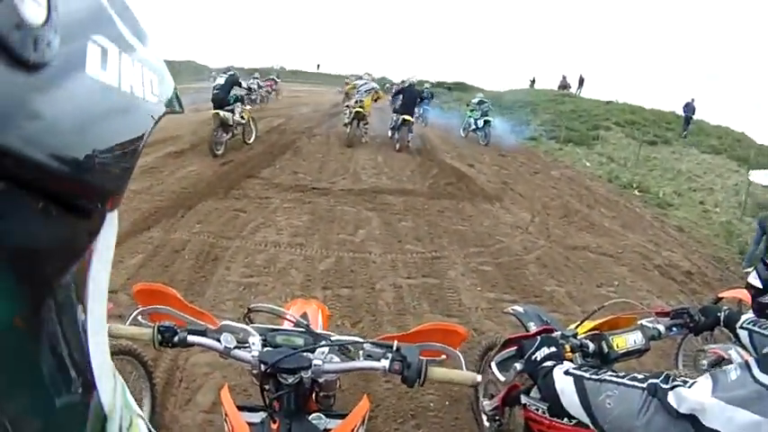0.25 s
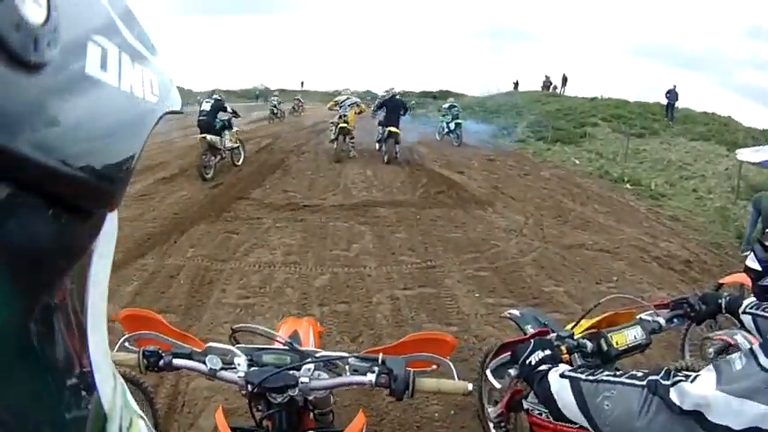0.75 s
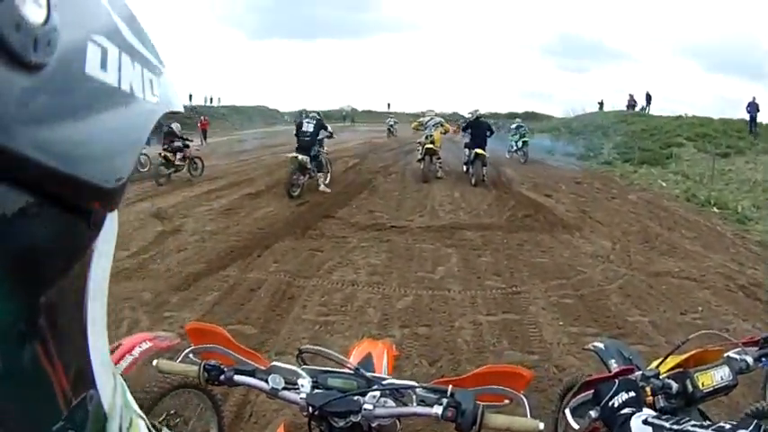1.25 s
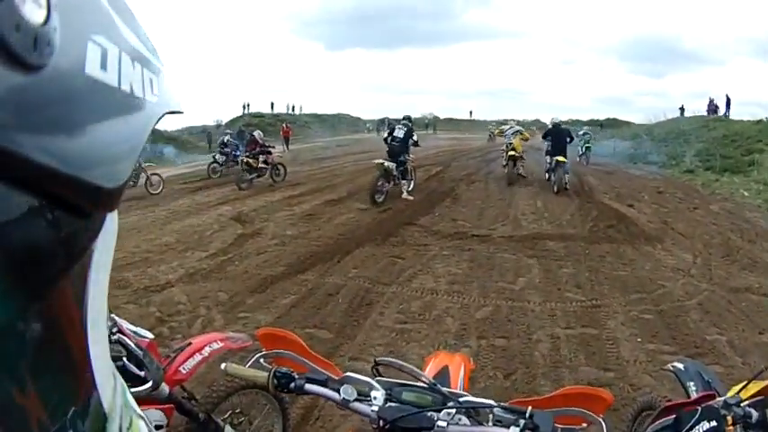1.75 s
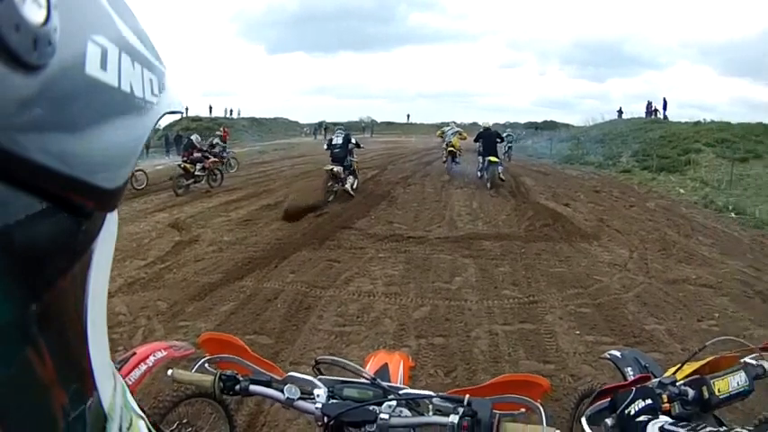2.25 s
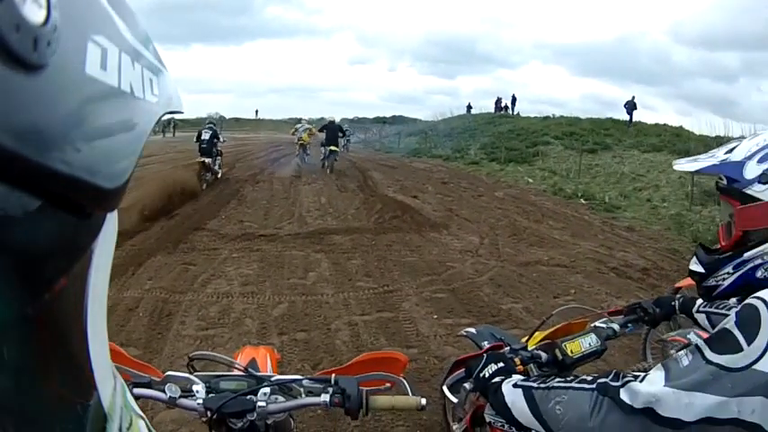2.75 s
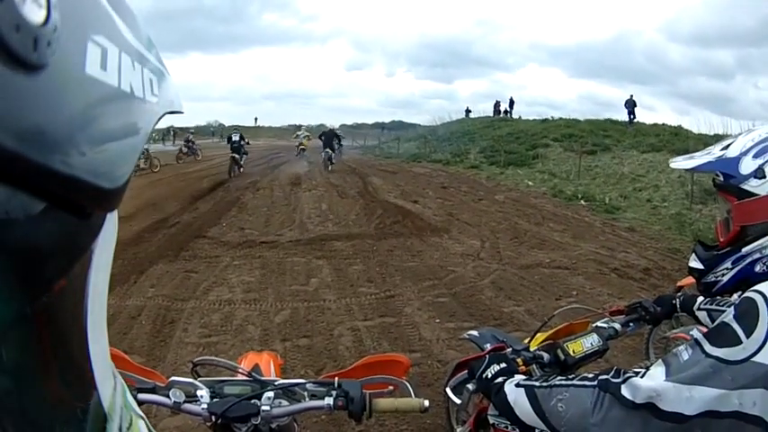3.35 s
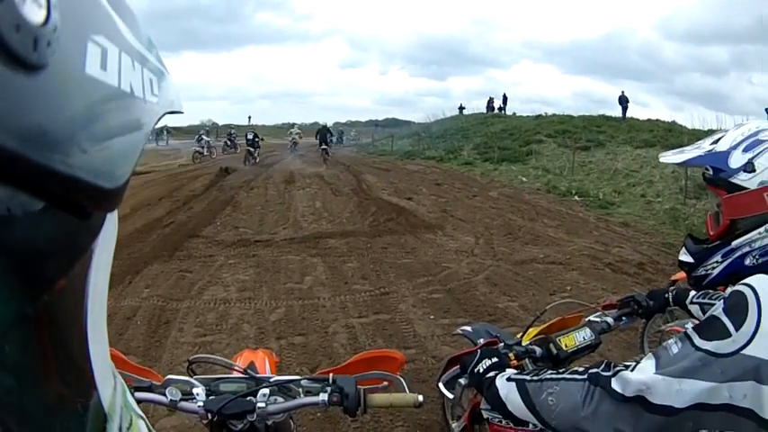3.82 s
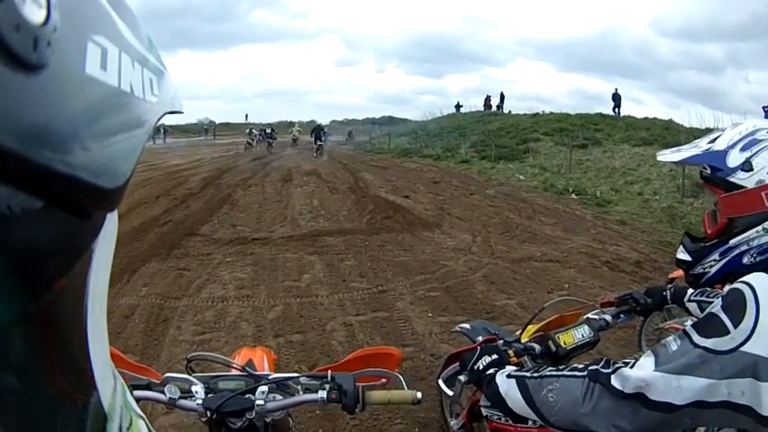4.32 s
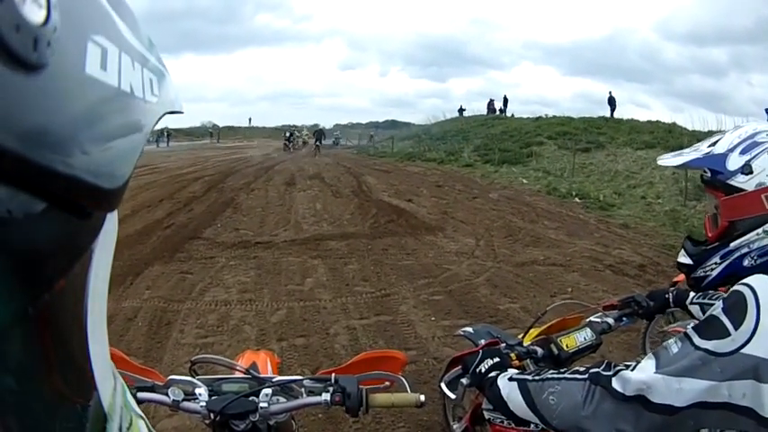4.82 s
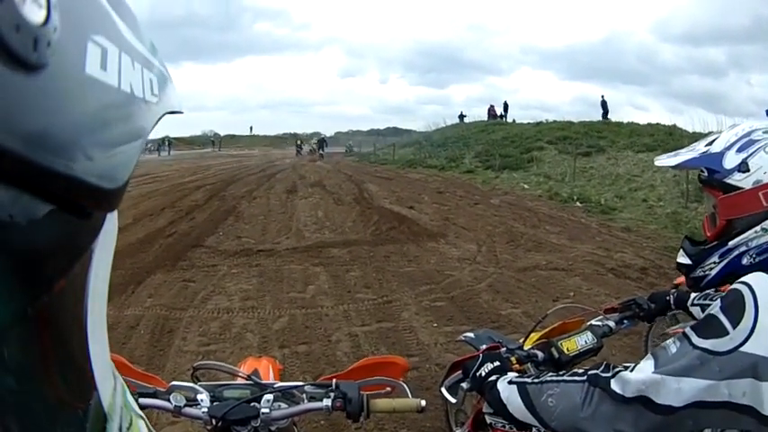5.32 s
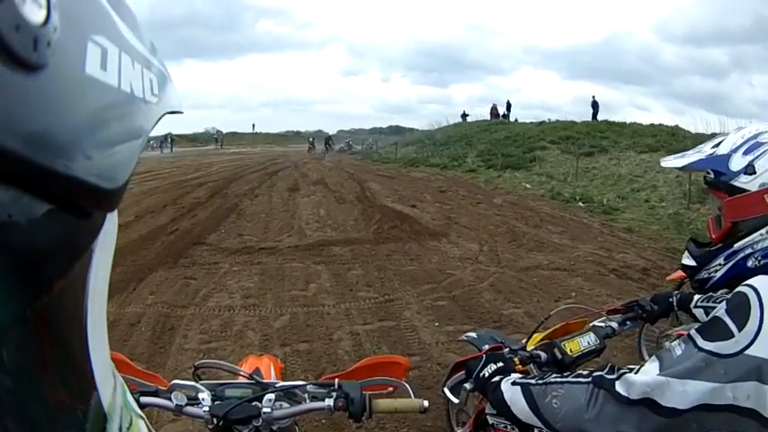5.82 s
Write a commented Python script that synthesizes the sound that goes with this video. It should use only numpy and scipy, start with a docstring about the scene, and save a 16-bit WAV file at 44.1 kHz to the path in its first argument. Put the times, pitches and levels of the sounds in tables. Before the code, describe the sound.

Motocross bikes on open dirt, heard from a rider's helmet through a closed microphone case that dulls the treble. From 0 s a row of engines idles out of step, with low thuds, chugging silencers, faint even hiss and tiny dry ticks. A bike up the track drones nasally, its pitch rising and falling, fading by about 5.6 s. A nearer one blips low at 0.4, 0.6, 1.3 and 1.8 s. A hard bang hits at 0.5 s, with barking pops around 1.1, 1.4 and 1.7 s. From 1.8 to 3.8 s a four-stroke alongside growls, roars and rasps with slight clang, its revs wavering, then cuts off. A strong blip at 3.8 s and thin metallic buzzes follow at 3.9 and 4.3 s. Thumping pops cluster from 4 s, throaty swells pass between 4.3 and 5 s, then loud blips and bangs come at 5.6 to 6 s.

```python
"""Dirt bikes at a motocross start, heard from a rider's helmet with the microphone in a closed case.
From the outset a row of bikes idles unevenly, exhausts bang and pop, one bike blips and another pulls away
up the track; other bikes swell throatily from 1.6 s. A four-stroke alongside is held on the throttle from
1.8 to 3.8 s, and thin parts buzz briefly afterwards. Each engine is a train of firings that ring its
silencer; noise gives the gas and an even hiss, and the case muffles the treble."""
import sys
import numpy as np
from scipy import signal
from scipy.fft import rfft, irfft, next_fast_len
from scipy.io import wavfile
from scipy.ndimage import uniform_filter1d

SR = 44100
rng = np.random.default_rng(int(sys.argv[2]) if len(sys.argv) > 2 else 0)


def wav_record(signal):
    """Record a signal, one row per channel, as 16-bit PCM in the file named by sys.argv[1]."""
    frames = np.transpose(np.atleast_2d(signal))
    bounded = np.clip(frames, -1, 1)
    # unit amplitude maps onto the largest positive 16-bit level
    quanta = np.round(bounded * 32767).astype(np.int16)
    wavfile.write(sys.argv[1], SR, quanta)


N = 267687

# raspy silencer colour: (frequency [Hz], level [dB])
RASP_COLOUR = [(600, -39), (1300, 10), (1700, 12.5), (2050, 8.5), (2400, -10.5), (4400, -34.5),
               (9000, -61.5)]
# sharp crack of an exhaust: (frequency [Hz], level [dB])
CRACK_COLOUR = [(400, -13), (1000, 4.5), (1800, 3.5), (3200, -4.5), (4400, -16), (5500, -16), (8000, -29.5),
                (11000, -46.5)]


def undb(db):
    """Decibels to amplitude gain."""
    return 10 ** (np.asarray(db) / 20)


def unit(x):
    """Scale to rms 1 over the whole scene."""
    return x / np.sqrt(np.mean(x ** 2) + 1e-18)


def curves(table):
    """The columns of a table, joined by straight lines in time."""
    s, *columns = np.transpose(table)
    return [np.interp(np.arange(N) / SR, s, c) for c in columns]


def bump(s, half_s):
    """A flat-topped swell around a moment."""
    return np.exp(-((np.arange(N) / SR - s) / half_s) ** 4 / 2)


def clicks(times, sizes):
    """Negative pressure clicks, each shared between two samples to fall between them."""
    at = np.clip(times * SR, 0, N - 2)
    i = at.astype(int)
    late = at - i
    return -np.bincount(i, sizes * (1 - late), N) - np.bincount(i + 1, sizes * late, N)


def firings(hz, jitter, scatter_db, running=True):
    """One pulse a cycle, each early or late by jitter [cycles]; a running engine is caught mid-cycle."""
    cycles = np.cumsum(hz) / SR + running * rng.random()
    k = np.arange(1, int(cycles[-1]) + 1)
    chance = rng.standard_normal((1024, 2))[:len(k)]
    times = np.interp(k + jitter * chance[:, 0], cycles, np.arange(N) / SR)
    strength_db = scatter_db * np.clip(chance[:, 1], -2, 2)
    return clicks(times, undb(strength_db))


def gas(pulses, decay_s, swell_s=0.0004):
    """A puff of turbulent gas that swells as the valve opens and then dies, with the pulse's energy."""
    keep = np.exp(-2 / (decay_s * SR))
    power = signal.lfilter([1 - keep], [1, -keep], pulses ** 2 + 1e-18)
    swelling = uniform_filter1d(power, int(swell_s * SR) + 1)
    return np.sqrt(np.abs(swelling)) * rng.standard_normal(N)


def ring(x, points, rounding=0.58, size=4096):
    """Pass x through a body with this spectrum, scaled to peak 1 for a unit click; rounding softens the front."""
    hz, db = np.transpose(points)
    f = np.maximum(np.fft.rfftfreq(size, 1 / SR), 1)
    above_last_db = 20 * np.log10(np.maximum(f / hz[-1], 1))
    shape_db = np.interp(np.log(f), np.log(hz), db) - above_last_db
    # rounding 0 puts all the ringing after the front, 1 spreads it evenly on both sides
    cepstrum = irfft(np.log(undb(shape_db)))
    cepstrum[1:size // 2] *= 2 - rounding
    cepstrum[size // 2 + 1:] *= rounding
    # an open pipe radiates a pulse as a swing down and up
    response = irfft(np.exp(rfft(cepstrum) + 1j * np.pi / 4))
    response = np.roll(response, size // 2)
    response = response / np.abs(response).max()
    return signal.fftconvolve(x, response)[size // 2:size // 2 + N]


def resonate(x, hz, q):
    """One resonance with steep skirts, at rms 1; its centre may move."""
    turn = np.exp(2j * np.pi * np.cumsum(hz * np.ones(N)) / SR)
    keep = np.exp(-np.pi * np.mean(hz) / (q * SR))
    # shift the centre to 0 Hz, smooth with two equal poles, shift back
    smooth = signal.lfilter([1], np.poly([keep, keep]), x / turn)
    return unit(np.real(turn * smooth))


def scatter(x):
    """Reflections from the ground, bikes and riders smear the pulses of engines further off."""
    size = next_fast_len(N + SR)
    delays_s = [.0013, .0029, .0047]
    z = np.exp(-2j * np.pi * np.fft.rfftfreq(size, 1 / SR)[:, None] * delays_s)
    allpass = np.prod((z - .5) / (1 - .5 * z), axis=1)
    return irfft(rfft(x, size) * allpass, size)[:N]


def glance(x, lag_s=0.002717, sway=.12):
    """A reflection off the bike and rider alongside; its path sways once a second and shifts the colour."""
    t = np.arange(N) / SR
    lag = lag_s * (1 + sway * np.sin(2 * np.pi * (t + rng.random())))
    return unit(x + .7 * np.interp(t - lag, t, x))


def row(throb_db=-1, sputter_db=-34, hiss_db=-29):
    """Idling engines out of step: low thuds, chugging silencers, a sputter on top and a hiss of gas."""
    # loudness of the row: (time [s], thud level [dB], chug level [dB])
    row_levels = [(0, -36.5, -39.5), (.4, -39.5, -40.5), (1.2, -37, -37), (1.7, -35.5, -38),
                  (2.3, -42, -38), (3.2, -40, -39), (3.9, -40.5, -37.5), (4.3, -34, -37.5),
                  (5.1, -32.5, -36), (5.5, -33, -36.5), (6.07, -34.5, -35)]
    # firing rates along the row: [Hz]
    idle_hz = [13.3, 17.8, 21.5, 25.0, 39]
    # colour of the low thuds: (frequency [Hz], level [dB])
    thud_colour = [(20, -43.5), (40, -16.5), (75, -7.5), (125, 0.5), (190, -3), (300, -12), (700, -42),
                   (3000, -80)]
    # colour of the chugging silencers: (frequency [Hz], level [dB])
    chug_colour = [(50, -24), (150, -0.5), (250, 6.5), (420, 3), (680, -4), (1000, -11.5), (1400, -25.5),
                   (2000, -37.5), (4500, -50), (10000, -67.5)]
    thud_db, chug_db = curves(row_levels)
    pulses = sum(firings(np.full(N, hz), jitter=.1, scatter_db=1.5) for hz in idle_hz)
    nearest = firings(np.full(N, 18.), jitter=.13, scatter_db=2)  # one more engine, at 18 Hz

    thud_drive = pulses + .5 * gas(pulses, decay_s=0.055)
    thud = unit(ring(thud_drive, thud_colour, rounding=0.59)) * undb(thud_db)
    chug_drive = pulses + .8 * gas(pulses, decay_s=.0035)
    chug = unit(ring(chug_drive, chug_colour, rounding=.66)) * undb(chug_db)
    # throb, sputter and hiss follow the chug at a fixed distance in level
    throb_gas = gas(nearest, decay_s=0.0061, swell_s=.012)
    throb = unit(ring(throb_gas, chug_colour)) * undb(chug_db + throb_db)
    sputter_gas = gas(nearest, decay_s=0.0016)
    sputter = unit(ring(sputter_gas, CRACK_COLOUR)) * undb(chug_db + sputter_db)
    hiss_gas = scatter(gas(pulses, decay_s=0.0056))
    hiss = unit(ring(hiss_gas, RASP_COLOUR)) * undb(chug_db + hiss_db)
    return scatter(thud) + chug + throb + sputter + hiss


def leaver():
    """A bike pulling away up the track: a nasal drone whose firing rate rises and falls."""
    # its revs and loudness: (time [s], firing rate [Hz], level [dB])
    leaver_revs = [(0, 83.6, -50), (.25, 86, -47.5), (.42, 99.6, -45), (.58, 113.5, -50.5),
                   (.72, 112.6, -43.5), (1.02, 91.13, -44), (1.28, 101.8, -42.5), (1.6, 86.26, -47.5),
                   (2.2, 116.5, -46), (3.6, 79.9, -49), (4.2, 78.9, -45.5), (4.42, 83.87, -41),
                   (4.65, 72.23, -52), (5.13, 89.47, -45.5), (5.3, 103.9, -43.5), (5.43, 108, -44.5),
                   (5.6, 94.8, -63)]
    # its silencer colour: (frequency [Hz], level [dB])
    leaver_pipe = [(60, -29), (200, -13), (440, -1), (560, 2.5), (690, 7.5), (810, 2), (950, -12),
                   (1300, -26), (8000, -69.5)]
    hz, level_db = curves(leaver_revs)
    pulses = firings(hz, jitter=.003, scatter_db=1.2)
    return scatter(unit(ring(pulses, leaver_pipe)) * undb(level_db))


def blip_throttle():
    """Firing rate and level: each throttle twist climbs, holds and runs down, quieter as the revs drop."""
    # throttle blips: (time the top is reached [s], hold [s], top firing rate [Hz], level [dB])
    blip_tops = [(.36, .11, 78.34, -34.5), (.64, 0.22, 82.37, -37), (1.26, 0.028, 77.1, -39),
                 (1.77, 0.045, 80.6, -36.5), (2.88, 0.079, 88.03, -38), (3.08, 0.15, 92.43, -38.5),
                 (3.54, 0.084, 95.04, -34.5), (3.83, 0.14, 84.1, -30.5), (4.34, 0.16, 82.68, -36),
                 (5.6, 0.25, 82.17, -33), (6.02, 0.062, 89.9, -32.5)]
    rest_hz, rest_db = 64.48, -44.0
    rise_hz_s, fall_hz_s, sag_db_per_hz = 90.48, 47.0, 2.0
    t = np.arange(N) / SR
    s, hold, top_hz, top_db = np.transpose(blip_tops)[:, :, None]
    climb_hz = rise_hz_s * np.maximum(s - t, 0)
    run_down_hz = fall_hz_s * np.maximum(t - s - hold, 0)
    below_hz = climb_hz + run_down_hz
    hz = np.maximum((top_hz - below_hz).max(0), rest_hz)
    level_db = np.maximum((top_db - sag_db_per_hz * below_hz).max(0), rest_db)
    return hz, level_db


def blipper(hz, level_db):
    """A bike blipped over and over: a low drone through its silencer, smeared by reflections."""
    # its silencer colour: (frequency [Hz], level [dB])
    blipper_pipe = [(40, -47), (85, -12.5), (165, 8), (260, 5), (335, 0.5), (450, -11.5), (700, -11),
                    (1100, -19.5), (1500, -47), (2300, -45.5), (2850, -44), (3800, -56.5), (8000, -76.5)]
    pulses = firings(hz, jitter=.006, scatter_db=1.3)
    return scatter(unit(ring(pulses, blipper_pipe)) * undb(level_db))


def whir(level_db=-75):
    """Chains, valves and intakes merge into an even hiss."""
    # steady hiss of the nearest engines: (frequency [Hz], level [dB])
    whir_colour = [(1000, 2), (2000, 2), (2700, 0.5), (3500, 3), (4400, -17.5), (5300, -4), (6200, -18.5),
                   (7000, -17), (10000, -33)]
    return unit(ring(rng.standard_normal(N), whir_colour)) * undb(level_db)


def crackle():
    """The silencers' steepest pulse fronts, heard as tiny dry ticks at uneven intervals."""
    # colour of the ticks: (frequency [Hz], level [dB])
    crackle_colour = [(1000, -9.5), (3000, -7), (5500, 4.5), (8000, -4), (11000, -18)]
    rate_hz, spread_db, level_db = 9.5, 3, -56.5
    ticks = firings(np.full(N, rate_hz), jitter=0.45, scatter_db=spread_db)
    return ring(ticks, crackle_colour, rounding=0.64) * undb(level_db)


def bangs(rasp_db=-1):
    """Hard firings of the nearest exhausts and lesser pops: pulses and gas thump, rasp, bark and crack."""
    # exhaust bangs: (onset time [s], thump level [dB], bark level [dB], crack level [dB])
    bang_list = [(0.495, -18.5, -35.5, -39), (.526, -9, -21.5, -30), (0.55, -22, -40, -54),
                 (.57, -19.5, -43, -45), (1.113, -23.5, -25.5, -35.5), (1.137, -35, -28, -53),
                 (1.158, -24, -24, -65), (1.414, -18, -32, -64), (1.434, -29, -24, -48),
                 (1.474, -25, -35, -61), (1.676, -16.5, -23, -32.5), (1.696, -27, -20, -53),
                 (1.712, -36, -25, -60), (2.044, -31, -18.5, -51), (2.086, -23, -30, -46),
                 (2.123, -19, -25, -44), (2.366, -33, -41, -43), (2.719, -24.5, -35, -39),
                 (2.814, -24, -33, -47), (2.887, -35, -45, -44), (3.256, -19, -43, -43),
                 (3.4, -16, -39.5, -36), (4.014, -19, -50, -50), (4.041, -19, -52, -48),
                 (4.066, -14, -45, -37), (4.111, -18.5, -46, -37), (4.136, -29, -51, -41.5),
                 (4.183, -19, -41, -49), (4.252, -23, -54, -46.5), (4.499, -19, -47, -67),
                 (4.63, -19, -41, -58), (4.693, -28, -39, -44.5), (4.859, -32, -37, -51),
                 (4.983, -22, -44, -47), (5.118, -23, -50, -58), (5.264, -20, -35, -43.5),
                 (5.37, -20.5, -51, -57), (5.491, -26, -48, -48.5), (5.545, -27.5, -41, -58),
                 (5.593, -23, -46, -47), (5.675, -13, -30, -50), (5.748, -18.5, -36, -62),
                 (5.767, -16.5, -32, -40), (5.786, -21, -42, -56), (5.887, -17, -31, -58),
                 (5.914, -10, -24, -34), (5.937, -27, -41, -53)]
    # colour of the thump: (frequency [Hz], level [dB])
    thump_colour = [(40, -32), (130, 2), (300, 5), (650, 4), (1000, -14), (1500, -29), (8000, -74)]
    # colour of the bark: (frequency [Hz], level [dB])
    bang_bark_colour = [(250, -23), (550, -2), (1000, 7), (1400, -14.5), (2200, -35), (8000, -60.5)]
    pop_rate_hz, pop_spread_db = 8, 3.5
    pop_thump_db, pop_bark_db, pop_crack_db = -30.5, -46.5, -58.5
    s, thump_db, bark_db, crack_db = np.transpose(bang_list)
    peak_s = s + .001  # the peak comes just after the onset
    pops = firings(np.full(N, pop_rate_hz), jitter=.4, scatter_db=pop_spread_db)
    thump = clicks(peak_s, undb(thump_db)) + pops * undb(pop_thump_db)
    bark = clicks(peak_s, undb(bark_db)) + pops * undb(pop_bark_db)
    crack = clicks(peak_s, undb(crack_db)) + pops * undb(pop_crack_db)

    thump_sound = ring(thump + .5 * gas(thump, decay_s=.006), thump_colour, rounding=.6)
    rasp_sound = ring(crack + .5 * gas(crack, decay_s=0.0054), RASP_COLOUR) * undb(rasp_db)
    bark_sound = ring(bark + .4 * gas(bark, decay_s=.007), bang_bark_colour, rounding=.8)
    crack_sound = ring(crack + gas(crack, decay_s=0.0023), CRACK_COLOUR, rounding=0.23)
    return thump_sound + rasp_sound + bark_sound + crack_sound


def swells():
    """Other bikes sound throaty for a moment as their firings excite a silencer resonance."""
    # swells: (time [s], half length [s], firing rate [Hz], glide [Hz/s], resonance [Hz], level [dB])
    swell_list = [(1.634, 0.052, 94.2, -29.5, 284, -36.5), (2.883, .05, 92.1, 121.5, 270.7, -37.5),
                  (3.322, .04, 87, -130, 252.9, -36.5), (4.27, 0.036, 86.8, 18.5, 340, -34.5),
                  (4.562, .08, 78.84, -45, 397, -35.5), (4.743, 0.026, 88.9, -59, 599.4, -37),
                  (4.818, 0.06, 83.33, -29, 392, -33), (4.97, 0.04, 96.1, 0, 385, -35),
                  (5.038, .03, 99.7, -1, 500.6, -37)]
    out = 0
    for s, half_s, hz, glide, ring_hz, db in swell_list:
        from_middle_s = np.clip(np.arange(N) / SR - s, -2 * half_s, 2 * half_s)
        pulses = firings(hz + glide * from_middle_s, jitter=.005, scatter_db=1.5)
        out = out + resonate(pulses, ring_hz, q=2.8) * undb(db) * bump(s, half_s)
    return out


def thumper_firings(scatter_db):
    """Firings of the four-stroke alongside, and when its throttle is open."""
    # its revs while the throttle is open: (time [s], firing rate [Hz])
    thumper_revs = [(1.8, 56.64), (1.917, 69.83), (2.036, 49.06), (2.2, 57.94), (2.32, 59.06),
                    (2.45, 53.51), (2.65, 53.01), (2.88, 54.29), (3.07, 46.41), (3.33, 47.96), (3.5, 55.42),
                    (3.72, 68.06), (3.8, 64.65)]
    hz, = curves(thumper_revs)
    t = np.arange(N) / SR
    throttle = (t > thumper_revs[0][0]) & (t < thumper_revs[-1][0])
    pulses = firings(hz * throttle, jitter=.0015, scatter_db=scatter_db, running=False)
    return pulses, throttle


def growl(pulses, q=3.1):
    """Low voice of the four-stroke: a moving resonance, lower by the end, favours one or two harmonics."""
    # its path: (time [s], centre [Hz], level [dB])
    growl_path = [(2.1, 346, -51), (2.35, 310, -50), (2.62, 320.6, -42.5), (3.1, 271, -38.5),
                  (3.55, 276, -41), (3.72, 210, -47)]
    hz, level_db = curves(growl_path)
    return resonate(pulses, hz, q) * undb(level_db)


def thumper():
    """The four-stroke alongside: hard pulses growl, roar, bark, rasp and clang on the open throttle."""
    # its loudness: (time [s], body [dB], roar [dB], bark [dB], rasp [dB], clang [dB])
    thumper_levels = [(1.8, -46, -52, -48, -92, -88), (1.85, -44, -42, -50, -57.5, -67),
                      (1.91, -43, -46, -47, -72.5, -66), (1.972, -60, -56.5, -56.5, -89, -87),
                      (2.06, -43, -43, -52, -66, -70.5), (2.3, -39.5, -53, -47.5, -66.5, -71.5),
                      (2.612, -40.5, -50, -51, -61.5, -69.5), (3.12, -41.5, -68.5, -50, -73.5, -76.5),
                      (3.36, -43.5, -71, -53, -74, -77), (3.42, -39, -40.5, -52, -55.5, -73),
                      (3.55, -39, -48, -63, -57.5, -73.5), (3.68, -45, -40.5, -47, -55, -72.5),
                      (3.76, -39.5, -44, -55, -55, -71.5), (3.8, -52, -66, -67, -78, -90)]
    # its silencer colour: (frequency [Hz], level [dB])
    thumper_pipe = [(30, -27.5), (58, -10), (110, 5), (200, 3), (290, 0), (385, 4.5), (480, 1.5),
                    (700, -11.5), (1000, -25), (1500, -37), (8000, -92)]
    # colour of its roar: (frequency [Hz], level [dB])
    roar_colour = [(250, -28.5), (480, -10), (620, 5), (760, -3.5), (900, -7), (1300, -37.5), (5000, -71)]
    # colour of its bark: (frequency [Hz], level [dB])
    bark_colour = [(200, -36.5), (600, -8.5), (900, 20), (1260, 12), (1600, -10.5), (3000, -43),
                   (8000, -59)]
    # colour of its clang: (frequency [Hz], level [dB])
    clang_colour = [(1200, -8), (2400, 7.5), (2950, 1), (3290, 7), (3520, -1.5), (4300, -8.5), (5300, -4),
                    (7500, -17.5), (11000, -63)]
    body_db, roar_db, bark_db, rasp_db, clang_db = curves(thumper_levels)
    pulses, _ = thumper_firings(scatter_db=1.8)
    # a stronger burn has a steeper front, so it is brighter too
    steep = pulses * np.abs(np.convolve(pulses, np.ones(3), "same"))
    puffs = gas(steep, decay_s=.002)
    body = unit(ring(pulses, thumper_pipe, rounding=.5)) * undb(body_db)
    roar = unit(ring(pulses, roar_colour)) * undb(roar_db)
    bark = glance(ring(pulses + .1 * puffs, bark_colour, rounding=.8)) * undb(bark_db)
    rasp = glance(ring(steep + .2 * puffs, RASP_COLOUR, rounding=1.0)) * undb(rasp_db)
    clang = glance(ring(steep + .5 * puffs, clang_colour, rounding=.6)) * undb(clang_db)
    return body + growl(pulses) + roar + bark + rasp + clang


def buzzes(blip_hz):
    """A shield or guard rings briefly at its own pitch, shaken by the four-stroke, else at the blipped rate."""
    # buzzing thin metal parts: (time [s], half length [s], pitch [Hz], level [dB])
    buzz_list = [(3.889, 0.089, 2871, -68.5), (4.323, 0.05, 2807, -63.5), (5.672, 0.12, 5302, -74.5)]
    hard, throttle = thumper_firings(scatter_db=8.0)
    blipped = firings(blip_hz, jitter=0.021, scatter_db=1)
    pulses = np.where(throttle, unit(hard), unit(blipped))
    shake = pulses + .6 * gas(pulses, decay_s=.003)
    return sum(resonate(shake, hz, q=5) * undb(db) * bump(s, half_s) for s, half_s, hz, db in buzz_list)


def scene():
    """All the engines on open ground."""
    blip_hz, blip_db = blip_throttle()
    background = row() + leaver() + blipper(blip_hz, blip_db) + whir() + crackle()
    foreground = bangs() + swells() + thumper() + buzzes(blip_hz)
    return (background + foreground)[None]


def follow(x, release_s):
    """Peak level that jumps up at once and sinks slowly."""
    sink = np.arange(N) / (SR * release_s)
    return np.exp(np.maximum.accumulate(np.log(np.abs(x) + 1e-9) + sink) - sink)


def record(dry, knee_db=-18, release_s=0.011, makeup_db=-1.0):
    """The microphone's limiter ducks briefly around each hard pulse; the closed case cuts the top."""
    top_hz = 11800
    over_knee = follow(dry[0], release_s) / undb(knee_db)
    gain = undb(makeup_db) / (1 + over_knee ** 10) ** .085
    limited = dry * uniform_filter1d(gain, size=64)
    low_pass = signal.ellip(8, .2, 70, top_hz, fs=SR, output="sos")
    return signal.sosfilt(low_pass, limited)


dry = scene()
out = record(dry)
wav_record(out)
```